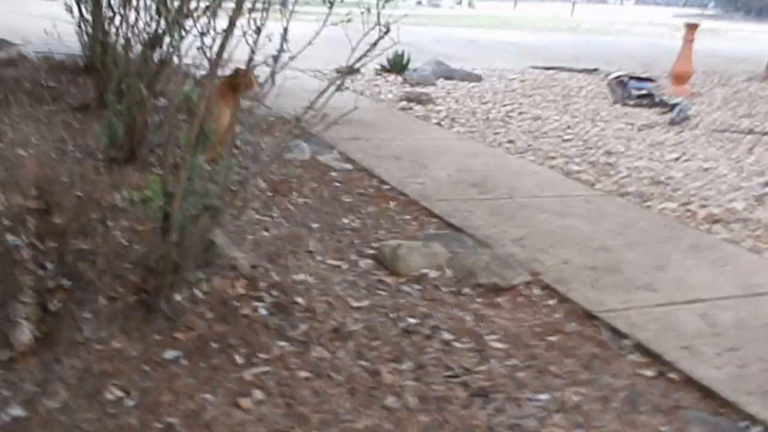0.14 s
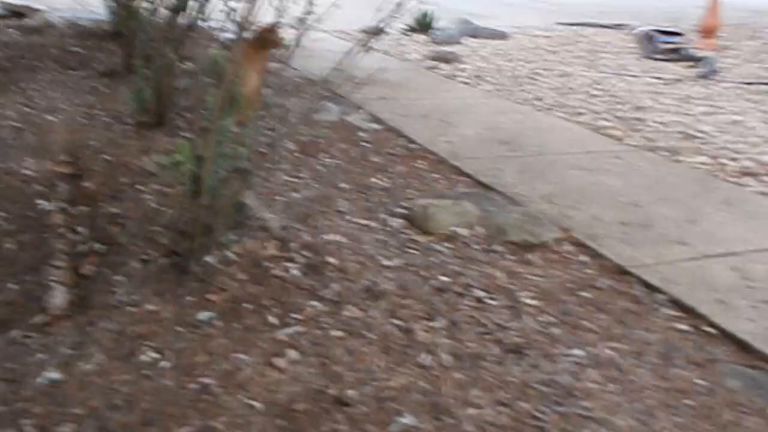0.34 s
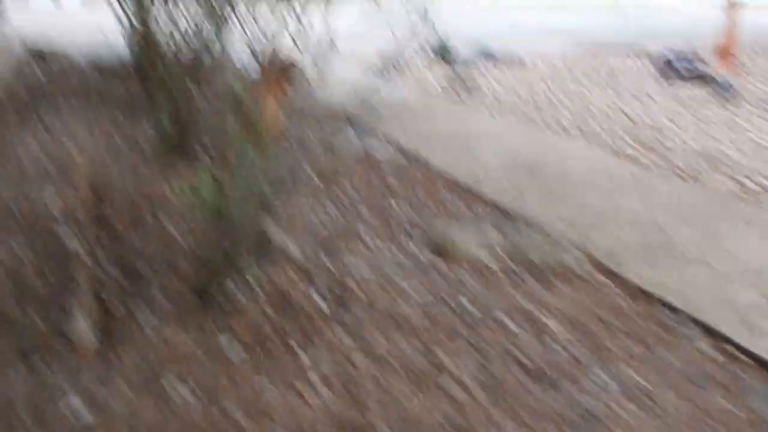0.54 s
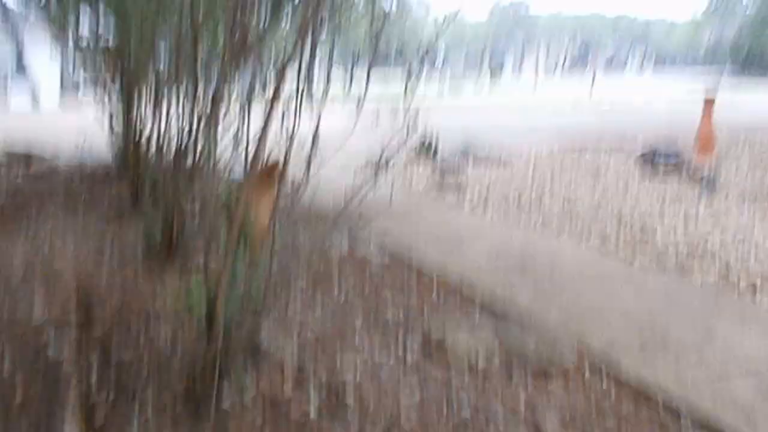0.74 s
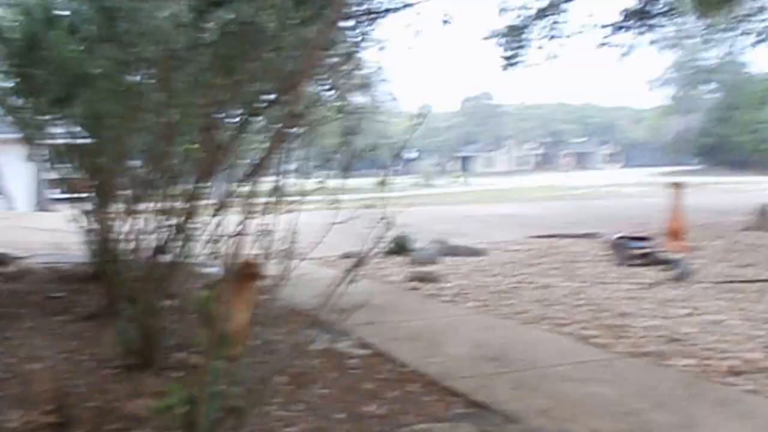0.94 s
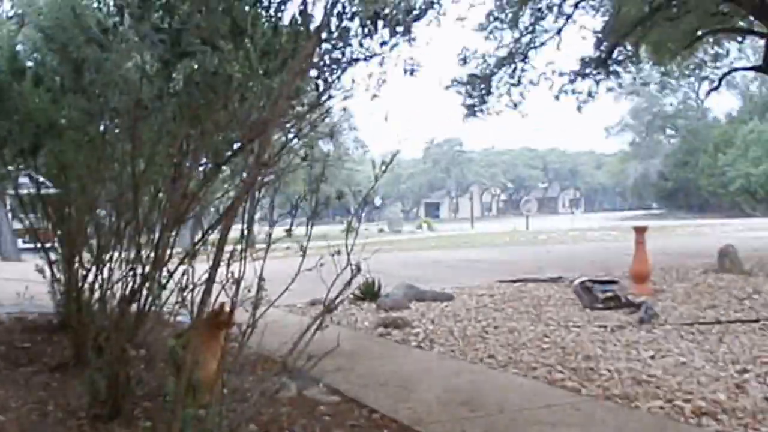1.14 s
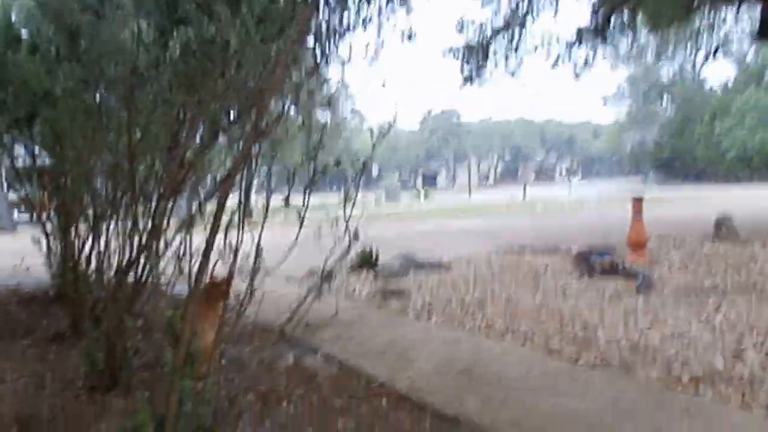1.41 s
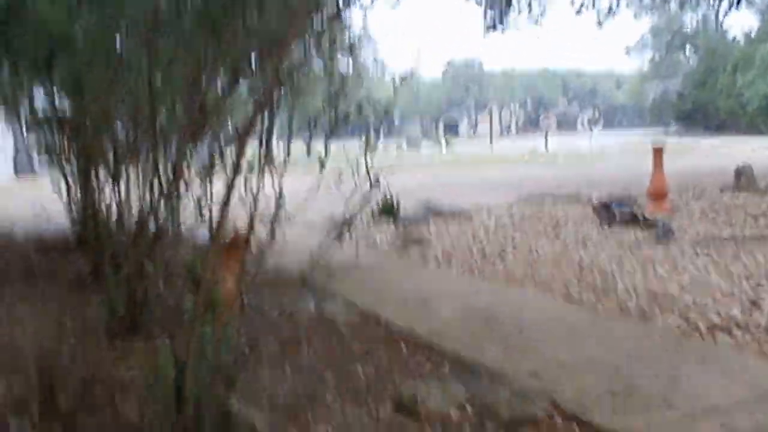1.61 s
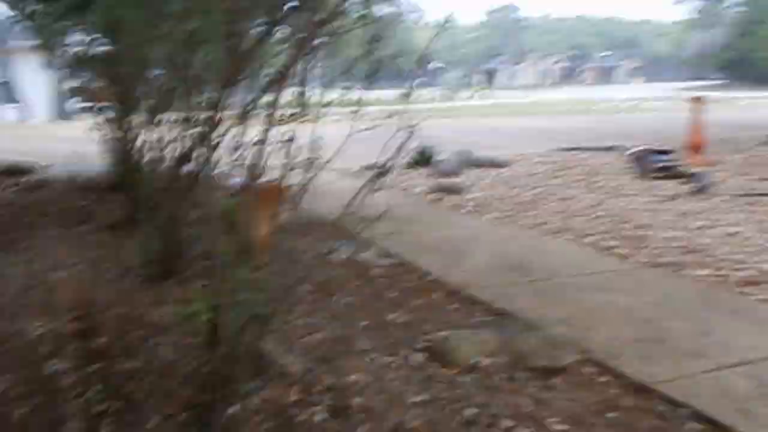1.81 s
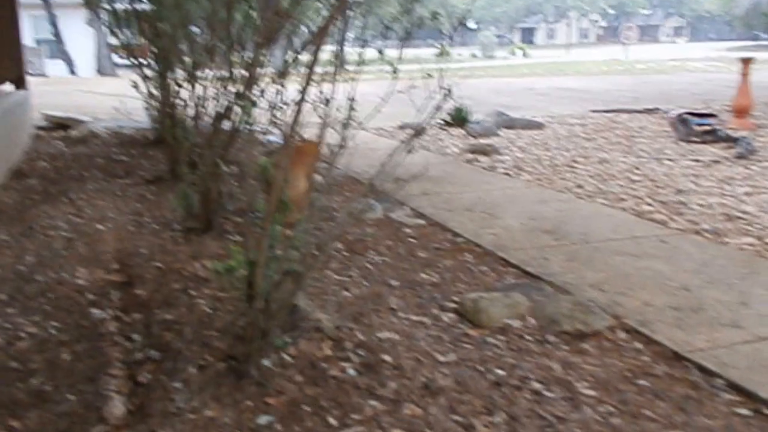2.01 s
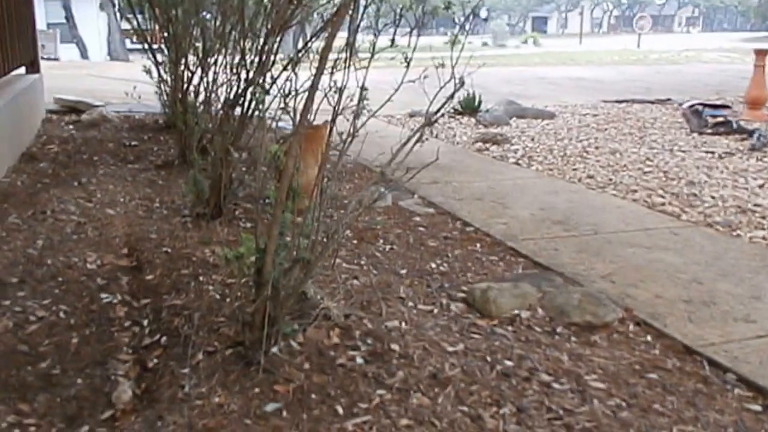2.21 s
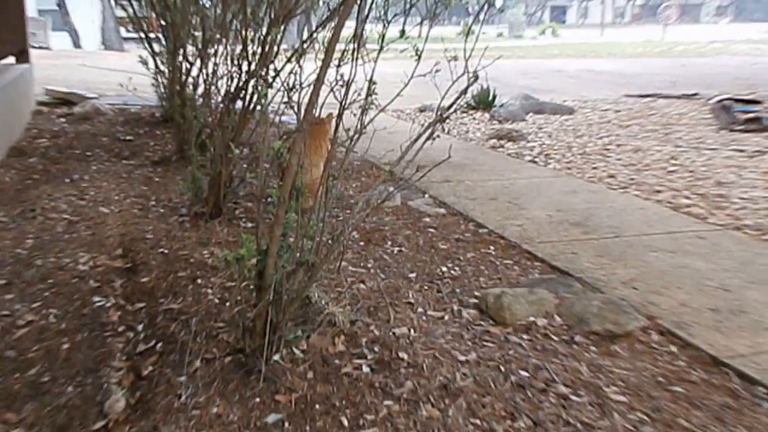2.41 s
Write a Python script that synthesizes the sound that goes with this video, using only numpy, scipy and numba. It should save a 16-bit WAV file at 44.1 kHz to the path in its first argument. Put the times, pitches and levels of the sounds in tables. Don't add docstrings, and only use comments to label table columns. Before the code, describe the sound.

Footsteps crunch loudly through dry leaves and bark mulch, with sharp twig snaps, then quieten

```python
import sys
import numpy as np
from scipy import signal
from scipy.io import wavfile
from scipy.ndimage import uniform_filter1d
from numba import njit

SR = 44100
rng = np.random.default_rng(int(sys.argv[2]) if len(sys.argv) > 2 else 0)


def dump_mix(stems):
    frames = np.atleast_2d(stems).T
    limited = np.clip(frames, -1, 1)
    pcm = np.round(limited * 32767).astype(np.int16)
    wavfile.write(sys.argv[1], SR, pcm)


def field_ratio(decibels):
    return 10 ** (np.asarray(decibels, dtype=float) / 20)


N = 112454


def unit(x):
    return x / np.sqrt(np.mean(x ** 2))


def band(x, lo_hz, hi_hz):
    return signal.sosfilt(signal.butter(2, [lo_hz, hi_hz], "band", fs=SR, output="sos"), x)


def noise_band(lo_hz, hi_hz):
    return unit(band(rng.standard_normal(N), lo_hz, hi_hz))


def walk(rate):
    hold = int(SR / rate)
    levels = np.repeat(rng.standard_normal(N // hold + 1), hold)
    smooth = uniform_filter1d(uniform_filter1d(levels, hold), hold)
    return unit(smooth[:N])


@njit
def rings(n, start, turn, fade, size, phase):
    y = np.zeros(n)
    for k in range(len(start)):
        phasor = size[k] * np.exp(1j * phase[k])
        advance = np.exp(1j * turn[k] - fade[k])
        first = int(start[k])
        for j in range(first, min(n, first + int(7 / fade[k]))):
            y[j] += phasor.imag
            phasor *= advance
    return y


def ring(t, hz, cycles, size, phase):
    hz = np.clip(hz, 60, 9000)
    turn = 2 * np.pi * hz / SR
    fade = np.log(1000) * hz / np.maximum(cycles, .5) / SR
    return rings(N, t * SR, turn, fade, size, phase)


def litter(rate, hz, spread, cycles, scatter_db, db):
    chance, size_chance, turn = rng.random((12000, 3)).T
    pitch_spread, ring_spread = rng.standard_normal((12000, 2)).T
    t = np.cumsum(-np.log(1 - chance)) / rate
    pitch = hz * 2 ** (spread * pitch_spread)
    length = cycles * np.exp(0.39 * ring_spread)
    size = field_ratio(-scatter_db * np.log(1.02 - size_chance))
    on = t < N / SR
    crackle = ring(t[on], pitch[on], length[on], size[on], 2 * np.pi * turn[on])
    return unit(crackle) * field_ratio(db)


def pressure(table):
    s, db, bark_db = np.array(table).T
    t = np.arange(N) / SR
    gain = field_ratio(np.interp(t, s, db, left=-99, right=-99))
    return np.array([gain, gain * field_ratio(np.interp(t, s, bark_db))])


def ground():
    thud_hz, thud_db, soil_hz, soil_db = 42, -27.5, 192, -24.5
    thud = field_ratio(thud_db) * noise_band(thud_hz / 2, thud_hz * 1.4) * field_ratio(3.0 * walk(6.7))
    return thud + field_ratio(soil_db) * noise_band(soil_hz / 2, soil_hz * 2)


def steps():
    # (time [s], level [dB], bark against leaves [dB])
    lean_in = [(0, -34, -1.1), (.09, -37.5, -1), (.175, -34.5, -4.5)]
    toe_down = [(.175, -41, 7), (.205, -36.5, 2), (0.215, -14.5, -2.5), (0.225, -6.5, -7.5),
                (0.239, -18.5, -5), (.248, -24, -4), (.264, -24.5, 0), (.277, -17.5, -13),
                (0.293, -37.5, 11)]
    first_step = [(.296, -29, 2), (.306, -20, 5.5), (.33, -16, -11), (.375, -9, -2), (.41, -11, -9),
                  (.43, -6, -8.5), (.48, -6.5, 1.5), (.525, -12, -3.5), (.545, -21.5, -4.5)]
    foot_roll = [(.545, -26.5, -5.5), (.565, -15, -12), (.582, -35, -10), (0.601, -22, -4),
                 (.609, -12.5, 1.5), (.624, -7.5, -2), (.634, -15.5, 6.5), (.665, -9.5, -8),
                 (0.708, -22.5, 3)]
    second_step = [(0.709, -16.5, -7), (.74, -12.5, -4.5), (.765, -8, -4), (.81, -12, -2.5),
                   (.86, -10, -2.5), (.89, -6.5, -5.5), (.928, -6, -6.5), (.945, -18.5, -3),
                   (.97, -24.5, -6.5)]
    foot_drag = [(0.971, -25, -5.5), (1.03, -18.5, -5.5), (1.06, -17.5, -4), (1.095, -20.5, -11.5),
                 (1.112, -18, -2), (1.129, -32, 2.5), (1.199, -25.5, -9), (1.212, -40, 0.5)]
    settling = [(1.395, -44, -1), (1.405, -23, 5), (1.411, -21.5, 0), (1.417, -35, -11.5),
                (1.438, -19, -15.5), (1.455, -57, -0.5)]
    still_settling = [(1.48, -53, -0.5), (1.506, -31.5, 0), (1.528, -40, 1), (1.554, -21.5, -9),
                      (1.59, -34.5, 2.5), (1.604, -57, -1), (1.644, -51, -6.5), (1.662, -30.5, -7),
                      (1.72, -47.5, -10)]
    weight_shift = [(1.721, -51, 2), (1.75, -34.5, -1), (1.8, -35, -2.5), (1.815, -27, -7.5),
                    (1.865, -23.5, -8), (1.89, -31, -6.5), (1.97, -40, -1), (1.993, -27, -2.5),
                    (2.03, -41, -1.5)]
    third_step = [(2.031, -36, 0.5), (2.045, -32, 6), (2.07, -29.5, -0.5), (2.109, -18.5, -16),
                  (2.173, -21, 0.5), (2.184, -12.5, -3), (2.238, -11.5, -14), (2.249, -31.5, 4),
                  (2.29, -44.5, -2)]
    foot_lift = [(2.291, -43, 6), (2.301, -54.5, 19), (2.327, -26, -3.5), (2.345, -36.5, 3),
                 (2.363, -27, -11), (2.405, -46.5, 15), (2.441, -17, -12.5), (2.513, -34, 0),
                 (2.549, -57, 22)]
    # (fractures [per s], pitch [Hz], pitch spread [octaves], ring [cycles],
    # size scatter [dB], level [dB])
    whole_leaves = (2500, 3108.5, .17, 11, 3.0, 0.5)
    leaf_flakes = (1800, 3899, 0.3, 5.5, 3, -3)
    bark_pieces = (450, 793, 0.1257, 12.5, 2.5, -4.5)
    bark_chips = (900, 1201.5, 0.2361, 8.5, 2.8, -1.5)
    fine_grit = (1200, 2004.5, 0.63, 2.5, 2, -11)

    moves = (lean_in, toe_down, first_step, foot_roll, second_step, foot_drag,
             settling, still_settling, weight_shift, third_step, foot_lift)
    leaf, bark = sum(pressure(move) for move in moves)
    bunch_per_s, bunch_db = 170, 1
    bunch = unit(field_ratio(bunch_db * walk(bunch_per_s)))
    thin = litter(*whole_leaves) + litter(*leaf_flakes)
    thick = litter(*bark_pieces) + litter(*bark_chips)
    under = litter(*fine_grit) + ground()
    return bunch * (leaf * thin + bark * thick + np.sqrt(leaf * bark) * under)


def snaps():
    # (time [s], peak [dB], ring [Hz])
    twigs = [(.0478, -1.5, 1045), (0.049, -2.5, 3300), (0.0582, -13, 1170), (0.0577, -26, 2900),
             (.1868, -10.5, 3600), (.217, 0, 3040), (.226, 1, 2656), (0.2338, -1, 2910), (0.2508, 2, 3380),
             (0.2748, -10, 3200), (0.3045, -3, 1500), (.5255, 4, 3640), (0.5984, 0.5, 3500),
             (0.6504, -1.5, 3190), (0.6721, 4, 3310), (1.0405, 0, 2720), (1.0548, -1, 2080),
             (1.104, -2.5, 2370), (1.4215, -4, 3350), (1.4321, -4.5, 3000), (1.499, -19, 3300),
             (1.5469, -14.5, 2660), (1.7541, -9.5, 3500), (1.863, -7.5, 2760), (2.042, -12, 931),
             (2.2366, -1.5, 3060), (.6075, -16.5, 790)]
    t60_s, crack_db, gap_s, click_db = 0.0042, -4, .0006, -9
    s, db, hz = np.array(twigs).T
    u = rng.random((len(s), 9)).T
    out = 0
    for k in range(3):
        late = np.round(k * gap_s * hz) / hz
        out = out + ring(s + late, hz, t60_s * hz, field_ratio(db + crack_db), 0 * s)
    for k, click_hz in enumerate((1300, 2300, 3800)):
        pitch = click_hz * (.8 + .4 * u[k + 3])
        size = field_ratio(db + click_db)
        out = out + ring(s + .001 * u[k], pitch, 4.0 + 0 * s, size, 2 * np.pi * u[k + 6])
    return out


def insect():
    hz, width_hz, level_db, from_s = 2640, 200, -37, 1.75
    whirr = noise_band(hz - width_hz / 2, hz + width_hz / 2)
    fade_in = np.clip((np.arange(N) / SR - from_s) / .15, 0, 1)
    return whirr * field_ratio(level_db + 2.0 * walk(8.3)) * fade_in


def garden():
    # (frequency [Hz], level [dB per Hz])
    spectrum = [(15, -35), (25, 2), (335, -1.5), (693, -3.5), (826, -5), (1860, -5), (3770, -5),
                (4800, -33.5), (6240, -57), (10600, -120)]
    f, level_db = np.array(spectrum).T
    swell = walk(1.3)
    out = 0
    for hz in 25 * 2 ** np.arange(0, 7.8, .5):
        db = np.interp(np.log(hz), np.log(f), level_db) + 10 * np.log10(hz)
        db = db + 0.6 * swell + 0.53 * walk(12)
        out = out + field_ratio(db) * noise_band(hz / 1.243, hz * 1.226)
    return unit(out) * field_ratio(-34)


def reflections(near):
    wall_s, wall_db, smear_s, smear_db = .0095, -20, 0.0087, -22
    wall = field_ratio(wall_db) * np.roll(near, int(wall_s * SR))
    t = np.arange(4000) / SR
    tail = rng.standard_normal(len(t)) * np.exp(-np.log(1000) * t / smear_s)
    shrubs = field_ratio(smear_db) * tail / np.sqrt(np.sum(tail ** 2))
    return wall + signal.fftconvolve(near, shrubs)[:N]


def scene():
    near = steps() + snaps()
    return (near + reflections(near) + insect() + garden())[None]


def roll_off(x):
    return signal.sosfilt(signal.butter(12, 15200, fs=SR, output="sos"), x)


def record(dry):
    roll_hz, top_hz, clip, knee = 3803, 4750, 1, 60
    x = signal.sosfilt(signal.butter(6, roll_hz, fs=SR, output="sos"), dry)
    x = signal.sosfilt(signal.ellip(8, 1, 85, top_hz, fs=SR, output="sos"), x)
    x = x / (1 + np.abs(x / clip) ** knee) ** (1 / knee)
    x = signal.sosfilt(signal.ellip(8, .1, 60, 15200, fs=SR, output="sos"), x)
    return roll_off(x)


dry = scene()
out = record(dry)
dump_mix(out)
```